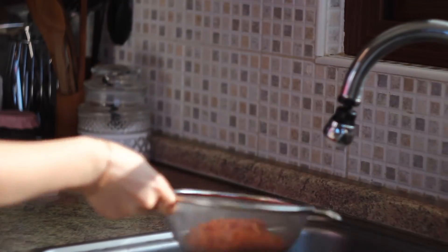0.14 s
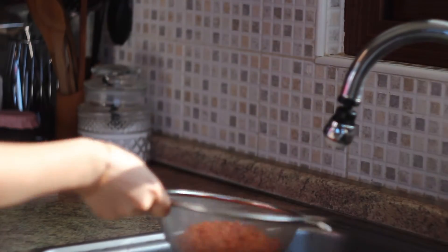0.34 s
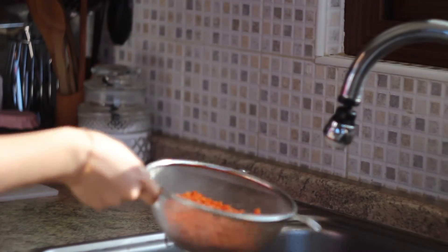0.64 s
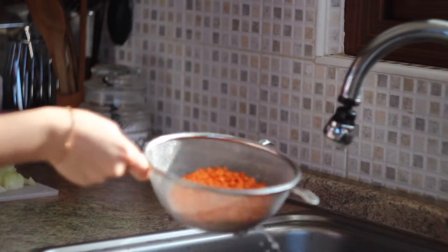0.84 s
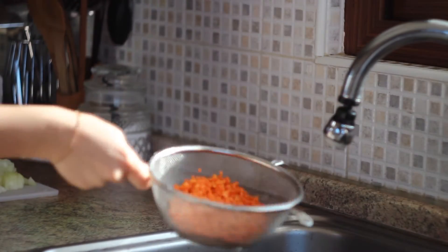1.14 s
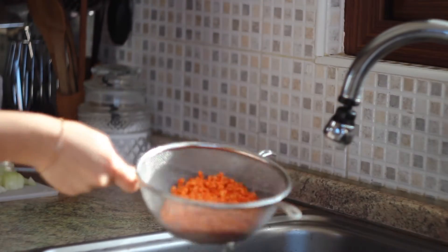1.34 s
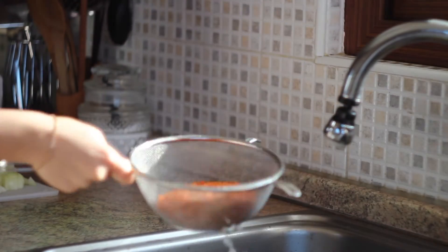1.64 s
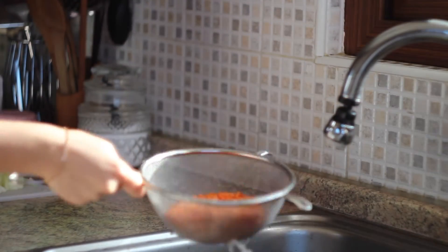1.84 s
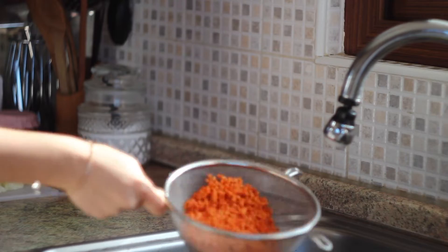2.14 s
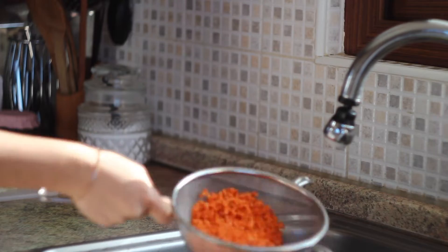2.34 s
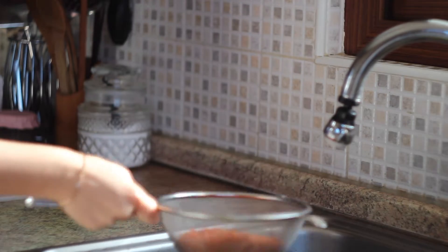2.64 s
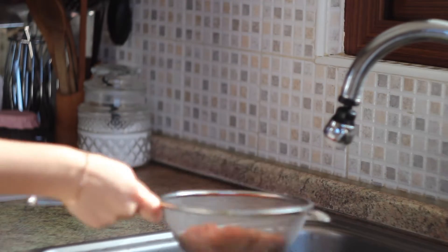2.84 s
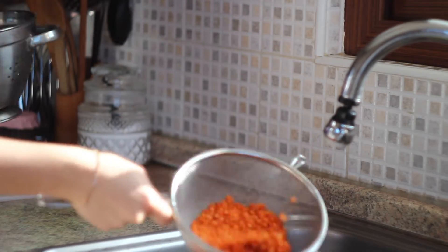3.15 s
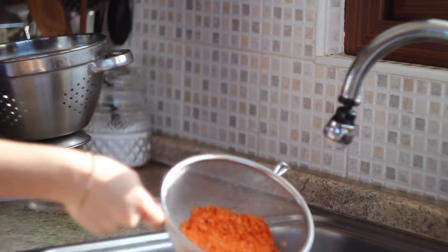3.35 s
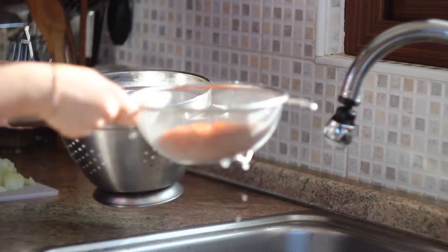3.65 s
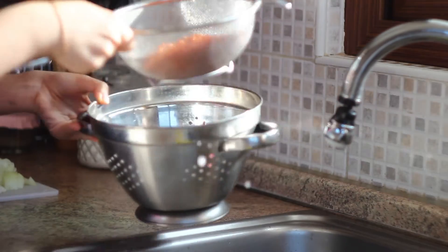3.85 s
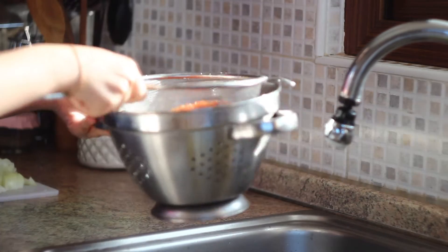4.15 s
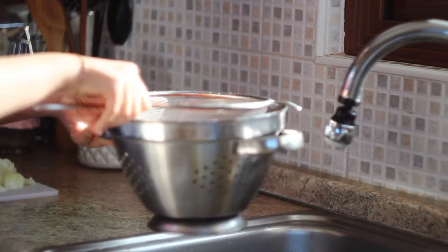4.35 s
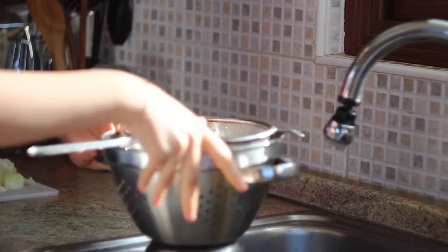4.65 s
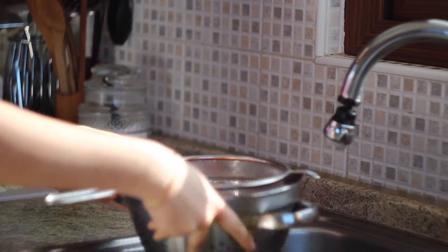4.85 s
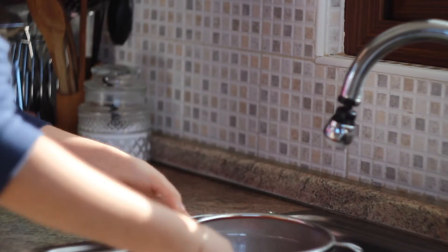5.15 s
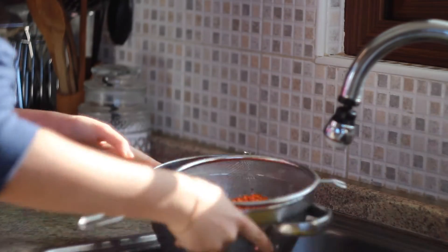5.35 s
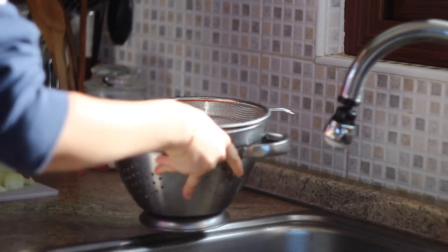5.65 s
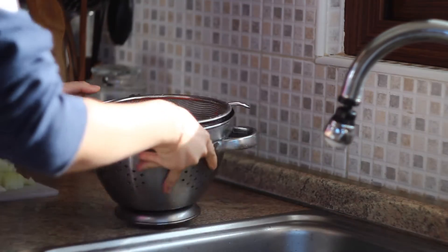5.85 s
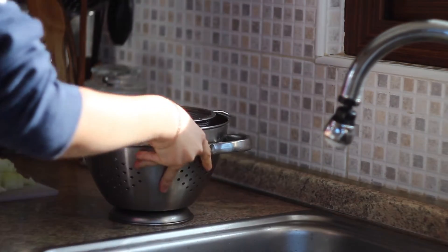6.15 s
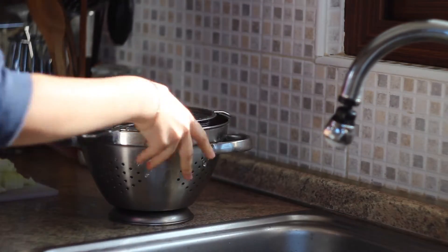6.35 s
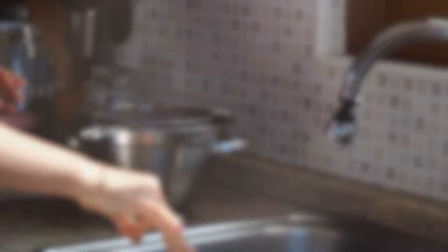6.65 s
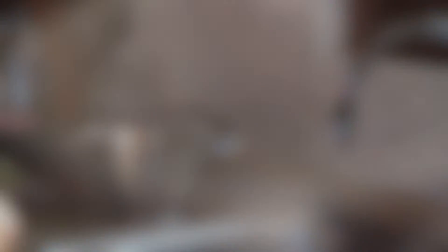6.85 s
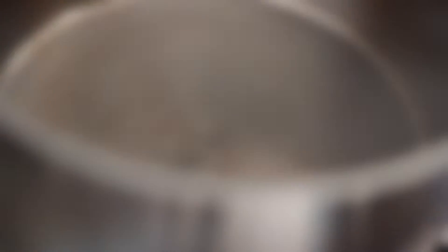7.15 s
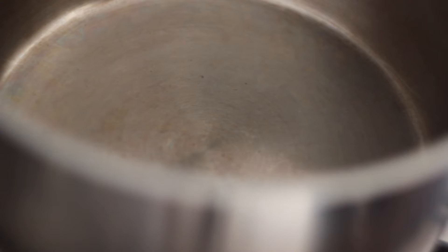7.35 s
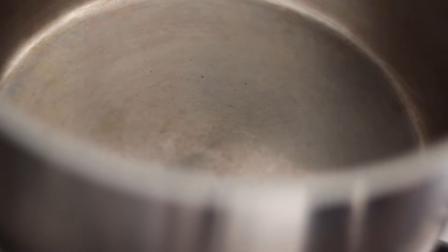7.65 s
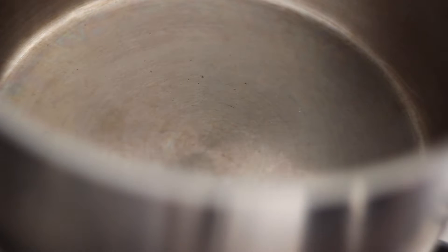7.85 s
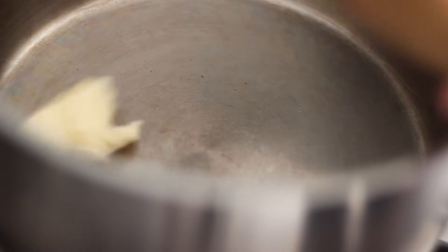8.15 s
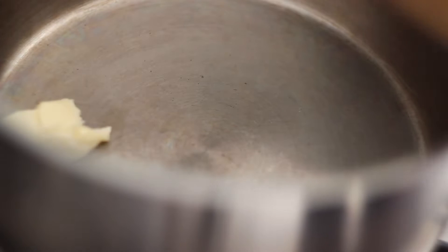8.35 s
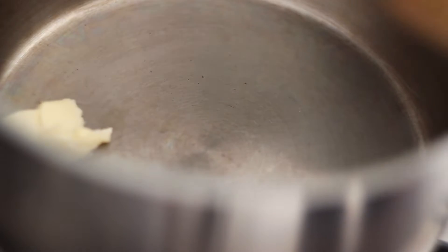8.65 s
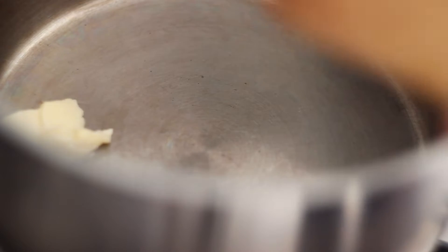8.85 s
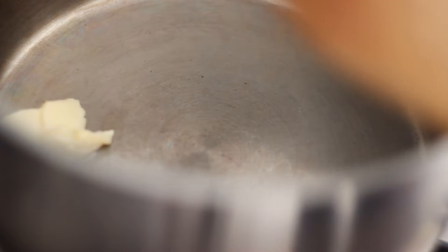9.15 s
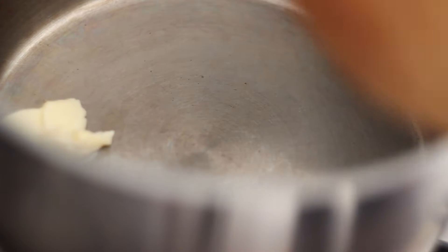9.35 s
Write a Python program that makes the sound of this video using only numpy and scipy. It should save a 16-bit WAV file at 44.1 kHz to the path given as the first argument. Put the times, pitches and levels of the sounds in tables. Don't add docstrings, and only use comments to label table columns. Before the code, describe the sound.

Rhythmic grainy swishing of wet lentils in mesh, drain gulps, a loud metal clang, sink and counter knocks, then faint knife scrapes by a pot.

```python
import sys
import numpy as np
from scipy import signal
from scipy.fft import rfft, irfft, next_fast_len
from scipy.io import wavfile
from scipy.ndimage import map_coordinates

SR = 44100
rng = np.random.default_rng(int(sys.argv[2]) if len(sys.argv) > 2 else 0)


def nominal_scale(level):
    x = np.asarray(level, float) / 20
    return 10 ** x


def generate_wav(signal):
    frames = np.transpose(np.atleast_2d(signal))
    scaled = np.clip(frames, -1, 1) * 32767
    pcm = np.round(scaled).astype(np.int16)
    wavfile.write(sys.argv[1], SR, pcm)


N = 418509

# (time [s], peak [dB], low [dB rel], bright [dB rel], rattle T60 [s])
CLANG = [
    (4.524, -8.5, -1.5, -1.1, 0.089),
]
# (time [s], peak [dB], low [dB rel], bright [dB rel], rattle T60 [s])
REBOUNDS = [
    (5.3587, -38, -8, -10, .03),
    (5.3663, -25.5, 3, -9, 0.077),
    (5.3739, -28.5, 2, -11, 0.34),
]
# (centre [Hz], width [Hz], level [dB])
BOWL_ZONES = [(3340, 57, 6), (4500, 98, -10), (5480, 28, -12), (5900, 24, -9), (6080, 48, -9),
              (7110, 34, -13), (7840, 41, -5), (9200, 68, -9), (12600, 32, -17), (12700, 34, -14)]
# (frequency [Hz], level [dB], T60 [s])
TICK_RING = [(5240, 1, 0.1)]


def lentils():
    # (time [s], level [dB], snap [dB])
    flicks = [(0.014, -45.5, 2), (0.169, -41, -3), (0.304, -35.5, -7), (0.403, -33, 1.5),
              (0.535, -40.5, -8), (0.617, -37, 3.5), (0.744, -39, -5.5), (0.847, -38.5, 4.5),
              (1.003, -42.5, -6), (1.071, -38.5, 5), (1.165, -55, 8), (1.294, -47, 0.5)]
    # (time [s], level [dB], snap [dB])
    shakes = [(1.512, -44.5, -7), (1.602, -40.5, -13), (1.704, -38, -6.5), (1.804, -38, -16),
              (1.895, -40.5, -4), (2.009, -39, -7), (2.127, -46, -12), (2.22, -33.5, -14),
              (2.339, -36, -10.5), (2.423, -34.5, -7), (2.535, -36, -3.5), (2.618, -41.5, -17),
              (2.69, -51, 8), (2.837, -37.5, -10), (2.963, -37.5, -9), (3.035, -40, -13), (3.105, -50, 7.5),
              (3.162, -41.5, -1.5), (3.255, -43.5, 1), (3.33, -46.5, 4), (3.462, -47, 0.5)]
    # (fizz [dB], fizz per snap [dB/dB], T60 [s], log T60 per snap [1/dB])
    flick_rule = (-12.5, 1.86, 0.36, -0.076)
    # (fizz [dB], fizz per snap [dB/dB], T60 [s], log T60 per snap [1/dB])
    shake_rule = (-13, 1.3, 0.01, -0.0649)
    # (time [s], level [dB])
    rolling = [
        (0.0, -51),
        (0.46, -54),
        (0.72, -50),
        (1.45, -54),
        (1.77, -44),
        (2.07, -53),
        (2.3, -44),
        (3.27, -45.5),
        (3.6, -63),
    ]
    # (time [s], level [dB], half length [s])
    swirl = [
        (1.8, -53, 0.08),
        (2.25, -47, 0.087),
        (2.528, -42, 0.12),
        (2.998, -47, 0.13),
    ]
    # (frequency [Hz], level [dB])
    heap = [(900, -13), (1500, -4), (2200, -2), (2850, -2), (3150, -1.5), (3500, -3), (4200, -4.5),
            (5500, -11.5), (8000, -40)]
    # (frequency [Hz], level [dB])
    mesh = [(3500, -27), (4800, -8), (5400, -7), (6200, -6), (7200, -4), (8000, -8), (8800, -11),
            (10000, -17), (13000, -28)]
    # (frequency [Hz], level [dB])
    fizz = [(7000, -30), (9500, -3), (12000, -1), (14500, 0), (15800, -2), (17000, -20)]

    t = np.arange(N) / SR
    power = toss_power(flicks, flick_rule, rise_s=0.016, hold_s=0)
    power += nominal_scale(-2.5) * toss_power(shakes, shake_rule, rise_s=0.024, hold_s=0.014)
    rolling_rel_db = np.array([[0], [-3.5], [-16]])
    power += nominal_scale(level_curve(rolling) + rolling_rel_db) ** 2
    dry = np.zeros(N)
    for layer_power, colour in zip(power, (heap, mesh, fizz)):
        grains = patter(spread_db=2.2, share=0.12)
        dry += np.sqrt(layer_power) * coloured(grains, colour)

    hoop = unit(filtered(patter(spread_db=4, share=0.023), resonances([(3120, 340, 0)])))
    for s, db, half_s in swirl:
        dry += nominal_scale(db) * np.exp(-((t - s) / half_s) ** 2) * hoop
    wet = signal.fftconvolve(dry, tail())[:N]
    return bassless(nominal_scale(-4.0) * dry + nominal_scale(-13.0) * wet, hz=500)


def toss_power(tosses, rule, rise_s, hold_s):
    fizz_db, fizz_per_snap, settle_s, settle_per_snap = rule
    power = np.zeros((3, N + SR))
    t = np.arange(SR) / SR - 0.1
    for s, db, snap_db in tosses:
        swell = np.exp(-(t / rise_s) ** 2)
        t60 = settle_s * np.exp(settle_per_snap * snap_db)
        settling = nominal_scale(-120 * np.maximum(t - hold_s, 0) / t60)
        rel_db = np.array([[0], [snap_db], [fizz_db + fizz_per_snap * snap_db]])
        power[:, round(s * SR):][:, :SR] += nominal_scale(db + rel_db) ** 2 * np.where(t < 0, swell, settling)
    return power[:, SR // 10:][:, :N]


def water_spray():
    # (time [s], level [dB])
    drops = [
        (1.003, -46),
        (1.44, -51),
        (1.624, -41),
        (2.92, -43),
        (3.05, -46),
        (3.068, -48),
        (3.163, -39),
        (3.169, -41),
        (3.18, -48),
        (3.56, -52),
    ]
    contacts = [(s, db, 0, 1, 0.025) for s, db in drops]
    spray = hits(contacts, TICK_RING, ring_db=-48, wet_db=-2, air_db=17, split=0.05, crack=0.6)
    return bassless(spray, hz=277)


def strainer_drop():
    # (time [s], peak [dB], low [dB rel], bright [dB rel], rattle T60 [s])
    bounces = [
        (4.2403, -20, 0.5, -9.5, 0.29),
        (4.2674, -27.5, 9, -10, 0.23),
        (4.3131, -14, -15, 8, 0.1),
        (4.4084, -19, -5, -12.5, 0.099),
    ]
    # (frequency [Hz], level [dB], T60 [s])
    hoop = [(756, 7, 0.11), (1510, 2, 0.15), (2570, -24, 0.18), (3000, -7, 0.12), (3840, 1, 0.12),
            (4520, -19, 0.064), (6200, -9, 0.18), (8870, -4, 0.15)]
    # (centre [Hz], width [Hz], level [dB])
    first_touch = [(2305, 43, -3), (2796, 48, -0.5), (3435, 37, -1.5), (3990, 27, -5), (4090, 37, -6),
                   (5400, 97, -6), (8800, 130, -6), (11000, 240, -12), (11300, 29, -12), (11800, 43, -13)]
    # (centre [Hz], width [Hz], level [dB])
    second_touch = [(899, 92, -3), (3040, 43, -8), (3460, 77, -13), (4100, 40, 4), (4970, 35, -2),
                    (5570, 110, -2), (6460, 52, -1), (7160, 140, -4), (8270, 41, 1), (10000, 49, -15)]
    # (centre [Hz], width [Hz], level [dB])
    third_touch = [(1550, 35, 1), (1850, 27, -11), (2740, 35, -4), (3380, 51, -1), (4560, 30, -4),
                   (5460, 71, -11), (6130, 69, -8), (6600, 33, -8), (7760, 47, -9), (8700, 53, -10)]
    touches = [(bounces[:2], first_touch), (bounces[2:3], second_touch), (bounces[3:], third_touch)]
    drop = np.zeros(N)
    for contacts, zones in touches:
        drop += hits(contacts, hoop, ring_db=-28.5, wet_db=-1.5, air_db=2.0, split=0.077, crack=0.55,
                     zones=zones, between_db=-8)
    return bassless(drop, hz=277)


def colander_clang():
    # (frequency [Hz], level [dB], T60 [s])
    held_modes = [(824, -17.5, 0.27), (1529, -11.5, 0.21), (2170, -16, 0.35), (2845, -13, .15),
                  (3050, -7, 0.18), (3240, -7.5, 0.18), (3320, -0.5, 0.17), (3380, -1, 0.23),
                  (3457, -6, 0.18), (4603, -15, .25), (5450, -9, .2), (5830, -5, .2), (6095, -5.5, 0.21),
                  (7860, -8, 0.28)]
    clang = hits(CLANG, held_modes, ring_db=-15.5, wet_db=-5.5, air_db=5.5, split=0.0122, crack=0.49,
                 zones=BOWL_ZONES, between_db=-7)
    return bassless(clang, hz=277)


def colander_at_sink():
    # (time [s], level [dB])
    slide = [
        (5.12, -58),
        (5.19, -51.5),
        (5.25, -41.5),
        (5.27, -30),
    ]
    # (time [s], peak [dB], low [dB rel], bright [dB rel], rattle T60 [s])
    sink_hits = [
        (5.2608, -26, -4, -11, 0.14),
    ]
    # (frequency [Hz], level [dB], T60 [s])
    rim = [(652, -10, 0.28), (1529, 3, 0.12), (1610, -4.5, 0.16), (2140, -10, .12), (2800, -0.5, .1),
           (2920, 5, 0.084), (3380, -3, .1), (3850, -10, .1), (4646, -2, .06), (5500, -11, .1),
           (6030, -4, .08)]
    # (frequency [Hz], level [dB], T60 [s])
    bowl = [(1220, -4, 0.13), (1524, -1, 0.083), (2260, -5, .15), (2780, 1, .12), (2900, -11, 0.12),
            (3410, -2, .18), (3870, -6, .15), (4145, -6, .3), (4330, -6, .1), (4667, -10, 0.11),
            (5500, -11, .15)]
    # (centre [Hz], width [Hz], level [dB])
    sink_zones = [(1480, 39, -5), (2830, 35, -4), (3420, 42, -9), (4240, 30, -11), (4660, 31, -11),
                  (5500, 150, -11), (6100, 72, -17), (7800, 58, -13), (8960, 47, -7)]
    knocks = hits(sink_hits, rim, ring_db=-16.5, wet_db=1.5, air_db=-1.0, split=0.016, crack=0.47,
                  zones=sink_zones, between_db=-7)
    knocks += hits(REBOUNDS, bowl, ring_db=-17.5, wet_db=-13.0, air_db=-3.0, split=0.0142, crack=0.42,
                   zones=sink_zones, between_db=-1)
    rim_filter = resonances([(hz, 350, db) for hz, db, _ in rim])
    grinding = unit(filtered(patter(spread_db=13, share=0.18), rim_filter))
    return bassless(knocks, hz=277) + nominal_scale(level_curve(slide)) * grinding


def colander_on_counter():
    # (time [s], peak [dB], low [dB rel], bright [dB rel], rattle T60 [s])
    edge_hits = [
        (5.924, -31.5, 0.97, -5, 0.072),
    ]
    # (frequency [Hz], level [dB], T60 [s])
    edge_modes = [(1525, 9, 0.17), (2870, -4, 0.2), (4940, -3, 0.092)]
    # (time [s], peak [dB], low [dB rel], bright [dB rel], rattle T60 [s])
    counter_hits = [
        (6.0006, -22.5, -5, -6, 0.029),
    ]
    # (frequency [Hz], level [dB], T60 [s])
    foot_modes = [(700, -27, .3), (990, -8, 0.33), (1827, -1, 0.21), (1950, -8.5, 0.22), (2040, 0.5, 0.26),
                  (2850, -6, .2), (3030, -5.5, 0.2), (3180, -4.5, .15), (3600, -12, .15), (4200, -7, .18),
                  (4280, -4.5, 0.16), (4640, -8, 0.14), (4861, -7, .1), (5910, -9, 0.17)]
    clip = hits(edge_hits, edge_modes, ring_db=-14.0, wet_db=5.5, air_db=-1.0, split=0.0285, crack=0.72)
    placed = hits(counter_hits, foot_modes, ring_db=-5.5, wet_db=-6.0, air_db=-13.5, split=0.0135, crack=1.1)
    return bassless(clip + placed, hz=277)


def loose_parts():
    # (time [s], peak [dB], low [dB rel], bright [dB rel], rattle
    # T60 [s])
    small_ticks = [
        (6.4418, -29.5, -22, -2, 0.0066),
        (6.8414, -33.5, 2, -15, 0.01),
        (6.9895, -39.5, 4, -10, 0.029),
                   (4.2355, -42, -3, -5, .015),
        (4.518, -30, -10, -2.5, .02),
    ]
    # (time [s], peak [dB], low [dB rel], bright [dB rel], rattle T60 [s])
    shivers = [
        (4.527, -17.5, -11, 8, 0.13),
        (6.003, -29, 3, -16, 0.52),
        (6.066, -33, -3, -7, 0.054),
        (6.187, -32.5, 6.5, 0.3, 0.15),
        (6.446, -43, -6, -11, 0.16),
        (6.768, -45.5, 5, -6, 0.36),
        (6.999, -41, 8, -17, 0.1),
        (7.215, -54, -11, -4, 0.47),
    ]
    # (time [s], peak [dB], low [dB rel], bright [dB rel], rattle T60 [s])
    edge_touch = [
        (5.9103, -32, 6.7, 2.5, 0.14),
    ]
    ticks = hits(small_ticks, TICK_RING, ring_db=-23, wet_db=-3.5, air_db=-1.5, split=0.081)
    buzz = hits(shivers[:1], TICK_RING, ring_db=-49, wet_db=-2.5, air_db=-6.0, split=0.05, crack=0.21,
                zones=BOWL_ZONES, between_db=-2)
    soft = hits(shivers[1:] + edge_touch, TICK_RING, ring_db=-49, wet_db=-5.0, air_db=-3.0, split=0.05, crack=0.2)
    return bassless(ticks + buzz + soft, hz=277)


def dragged_handle():
    # (time [s], level [dB])
    clatter = [
        (6.79, -42),
        (6.802, -58),
        (6.81, -35.5),
        (6.84, -29.5),
        (6.87, -60),
    ]
    # (time [s], peak [dB])
    rim_slips = [
        (6.8089, -29),
        (6.8174, -27),
        (6.8286, -20),
        (6.835, -22),
        (6.842, -19),
        (6.847, -25),
    ]
    # (centre [Hz], width [Hz], level [dB])
    handle_modes = [(490, 140, 1), (2000, 510, -1), (2700, 400, 3.5), (5220, 350, -1.5), (6400, 320, -8.5),
                    (7750, 490, -10), (11000, 1000, -15), (14200, 1500, -16)]
    response = resonances(handle_modes)
    grating = nominal_scale(level_curve(clatter)) * unit(filtered(patter(spread_db=2.0, share=0.049), response))
    knocks = np.zeros(N)
    for s, db in rim_slips:
        knocks[round(s * SR)] = nominal_scale(db + 15)
    dry = nominal_scale(-1.5) * grating + bassless(filtered(knocks, response), hz=300)
    wet = signal.fftconvolve(dry, tail())[:N]
    return bassless(dry + nominal_scale(-9.0) * wet, hz=250)


def knife():
    # (time [s], level [dB])
    scrapes = [
        [(7.62, -72), (7.68, -63), (7.76, -53), (7.82, -49.5), (7.87, -64)],
        [(7.9, -75), (7.94, -53), (7.976, -48), (7.998, -43), (8.02, -68)],
    ]
    # (centre [Hz], width [Hz], level [dB])
    blade = [(2460, 490, -10), (4800, 480, -6), (7440, 360, -5), (10700, 430, -6.5), (14500, 1500, -10)]
    # (time [s], peak [dB], low [dB rel], bright [dB rel], rattle T60 [s])
    dish_ticks = [
        (7.5805, -43.5, 11, -19, 0.032),
        (7.6466, -43.5, 6, -17, .02),
        (8.0005, -34, -11, -6.5, 0.032),
    ]
    grit = unit(filtered(patter(spread_db=2, share=0.1), resonances(blade)))
    scraping = sum(nominal_scale(level_curve(rows)) for rows in scrapes) * grit
    return scraping + hits(dish_ticks, TICK_RING, ring_db=-40, wet_db=-9.5, air_db=3.5, split=0.059, crack=0.39)


def pot():
    # (time [s], peak [dB], low [dB rel], bright [dB rel], rattle T60 [s])
    landing = [
        (8.1449, -42, 0.5, -16, 0.0096),
    ]
    # (frequency [Hz], level [dB], T60 [s])
    pot_modes = [(205, -4, .35), (345, -3, .28), (468, -4, .9), (1351, -2, .33), (2830, -7, .22)]
    pairs = []
    for s, *_ in landing:
        for hz, db, t60 in pot_modes:
            for side in (-1, 1):
                pairs.append((s, -48.5 + db, hz * (1 + side * 0.0015), t60))
    struck = hits(landing, pot_modes, ring_db=-18, wet_db=-8.5, air_db=-5, split=0.012)
    return struck + pings(pairs, glide=0, onset_s=0.0018)


def drain():
    # (time [s], level [dB], frequency [Hz], T60 [s])
    glugs = [
        (1.504, -34, 187, 0.074),
        (1.509, -30, 500, 0.066),
        (1.545, -25, 345, 0.042),
        (1.59, -32, 202, 0.13),
        (1.949, -37.5, 368, 0.15),
        (4.129, -31, 380, 0.067),
    ]
    return nominal_scale(2.0) * pings(glugs, glide=0.74, onset_s=0.018)


def thuds():
    # (time [s], level [dB], frequency [Hz], T60 [s])
    single_modes = [(4.243, -47, 400, 0.1), (4.315, -28.5, 373, 0.12), (4.526, -33.5, 317, 0.095),
                    (6.002, -33, 89, 0.068), (6.005, -40, 202, 0.17), (6.012, -17.5, 984, 0.15),
                    (6.08, -43, 113, 0.13), (6.25, -45, 113, 0.19), (6.259, -39.5, 203, 0.14),
                    (7.143, -23.5, 500, 0.024), (4.412, -21.5, 1552, 0.15), (4.415, -25, 1850, 0.17),
                    (4.318, -26.5, 533, 0.18), (5.37, -28, 2800, 0.14), (5.44, -40, 4145, 0.28),
                    (5.3, -29, 1529, 0.13), (6.035, -37.5, 250, 0.16), (6.245, -40, 705, 0.34),
                    (6.45, -42, 656, .25), (7.646, -34, 454, 0.045), (7.998, -31, 1200, 0.041),
                    (8.146, -47, 124, 0.23)]
    return pings(single_modes, glide=0, onset_s=0.011)


def rooms():
    # (frequency [Hz], density [dB per Hz])
    sink_air = [(35, -54), (60, -18), (108, -24.5), (281, -4), (427, -2), (469, -3.5), (924, -5.5),
                (1010, -8), (1310, -9.5), (1820, -11.5), (3500, -19.5), (5720, -22.5), (6430, -23.5),
                (16000, -26)]
    # (frequency [Hz], density [dB per Hz])
    corner_air = [(18, -49), (30, -12), (64, -16), (115, -4), (221, -9.5), (300, -3), (404, -3), (1280, -7),
                  (2100, -5.5), (2600, -11.5), (5000, -12.5), (9000, -18), (13500, -18.5), (15300, -14.5)]
    # (centre [Hz], width [Hz], level [dB rel])
    fridge = [(142.6, 11, -21), (197, 4.8, -19.5), (344.5, 3.6, -12.5), (549, 20, -12), (1052, 7.8, -16.5),
              (5700, 350, -15)]
    t = np.arange(N) / SR
    duck_db = np.zeros(N)
    for s, db, *_ in CLANG + REBOUNDS:
        recovery = (t > s) * np.exp(-np.abs(t - s) / 0.12)
        duck_db -= 0.2 * max(db + 38, 0) * recovery
    rumble = coloured(rng.standard_normal(N), sink_air)
    for hz, width, db in fridge:
        rumble += nominal_scale(db) * unit(filtered(rng.standard_normal(N), resonances([(hz, width, 0)])))
    flutter_db = 0.8 * map_coordinates(rng.standard_normal(100), [np.arange(N) * 9 / SR])
    hum = nominal_scale(-66.5) * np.sin(2 * np.pi * 48.3 * t)
    by_sink = nominal_scale(duck_db) * (nominal_scale(-50 + flutter_db) * rumble + hum)
    by_stove = nominal_scale(-53) * coloured(rng.standard_normal(N), corner_air)
    leave = np.interp(t, (6.6, 7.38), [1, 0])
    arrive = np.interp(t, (6.3, 7.33), [0, 1])
    return leave * by_sink + arrive * by_stove


def tail():
    # (frequency [Hz], T60 [s])
    tiles = [(300, 0.13), (790, 1), (2090, 0.75), (5510, 0.77), (14600, 0.43)]
    hz, t, z = signal.stft(rng.standard_normal(SR * 4 // 5), SR, nperseg=256)
    decay = nominal_scale(-60 * t / along(tiles, hz)[:, None])
    echo = signal.istft(z * decay, SR, nperseg=256)[1]
    echo[:180] = 0
    return echo / np.linalg.norm(echo)


def hits(contacts, modes, ring_db, wet_db, air_db, split, crack=1.0, zones=None, between_db=0):
    out = np.zeros(N + 2 * SR)
    t = np.arange(SR // 2) / SR
    hz, level_db, life = np.repeat(np.array(modes, float), 9, axis=0).T[..., None]
    fan = np.tile(np.linspace(-1, 1, num=9), len(modes))[:, None]
    for s, db, low_db, mid_db, t60 in contacts:
        high_db = mid_db + air_db
        tone = [(200, low_db - 19.0), (420, low_db - 11.5), (700, low_db), (1500, low_db), (2300, 0),
                (4300, 0.015), (5500, mid_db + 4.5), (8500, mid_db + 2.0),
                (10500, high_db + 2.0), (16000, high_db - 4.0)]
        noise = zoned(coloured(rng.standard_normal(len(t)), tone), zones, between_db)
        rattle = noise * (nominal_scale(-60 * t / t60) + crack * nominal_scale(-60 * t / 0.0033))
        detune, phase = rng.standard_normal((2, len(hz), 1))
        pitch = hz * (1 + split * (fan + 0.24 * detune))
        partials = nominal_scale(level_db - 60 * t / life) * np.sin(2 * np.pi * pitch * t + 3 * phase)
        ring = np.sum(partials, axis=0) * (1 - np.exp(-t / 0.00046))
        dry = nominal_scale(db) * (rattle + nominal_scale(ring_db) * ring)
        wet = nominal_scale(wet_db) * signal.fftconvolve(dry, tail())
        out[round(s * SR):][:len(wet)] += wet
        out[round(s * SR):][:len(t)] += dry
    return out[:N]


def pings(tones, glide, onset_s):
    out = np.zeros(N)
    t = np.arange(SR // 3) / SR
    for s, db, hz, t60 in tones:
        envelope = nominal_scale(db - 60 * t / t60) * (1 - np.exp(-t / onset_s))
        out[round(s * SR):][:len(t)] += envelope * np.sin(2 * np.pi * hz * t * (1 + glide * t))
    return out


def patter(spread_db, share):
    chance, size = rng.random((2, N))
    sizes = nominal_scale(-spread_db * np.log(size + 1e-9))
    spikes = unit((chance < share) * sizes * rng.standard_normal(N))
    return spikes + 1.2 * rng.standard_normal(N)


def resonances(peaks):
    def response(f):
        total = 0
        for k, (centre, width, db) in enumerate(peaks):
            damping = 1j * f * width
            total = total + (-1) ** k * nominal_scale(db) * damping / (centre * centre - f * f + damping)
        return total
    return response


def zoned(x, zones, between_db):
    if not zones:
        return x
    peaks = resonances(zones)
    return unit(filtered(x, lambda hz: nominal_scale(between_db) + np.abs(peaks(hz))))


def unit(x):
    return x / np.sqrt(np.mean(x ** 2) + 1e-20)


def along(points, hz):
    f, v = np.transpose(points)
    return np.interp(np.log(hz + 1), np.log(f + 1), v)


def level_curve(rows):
    s, db = np.transpose(rows)
    return np.interp(np.arange(N) / SR, s, db, left=-140, right=-140)


def filtered(x, response):
    m = next_fast_len(len(x) + 8192)
    return irfft(rfft(x, m) * response(np.fft.rfftfreq(m, 1 / SR)), m)[:len(x)]


def coloured(x, spectrum):
    return unit(filtered(x, lambda hz: nominal_scale(along(spectrum, hz))))


def bassless(x, hz):
    return signal.sosfilt(signal.butter(3, hz, "high", fs=SR, output="sos"), x)


def scene():
    sieving = lentils() + water_spray()
    metal = strainer_drop() + colander_clang() + colander_at_sink() + colander_on_counter()
    small_metal = loose_parts() + dragged_handle()
    stove = knife() + pot()
    return (sieving + metal + small_metal + stove + drain() + thuds() + rooms())[None]


def roll_off(x):
    return signal.sosfilt(signal.butter(12, 16980, fs=SR, output="sos"), x)


def record(dry):
    heard = filtered(dry[0], lambda hz: np.where(hz < 15800, 1, nominal_scale(-34)))[None]
    overloaded = heard / (1 + np.abs(heard) ** 8) ** (1 / 8)
    return roll_off(overloaded + 0.0011)


dry = scene()
out = record(dry)
generate_wav(out)
```